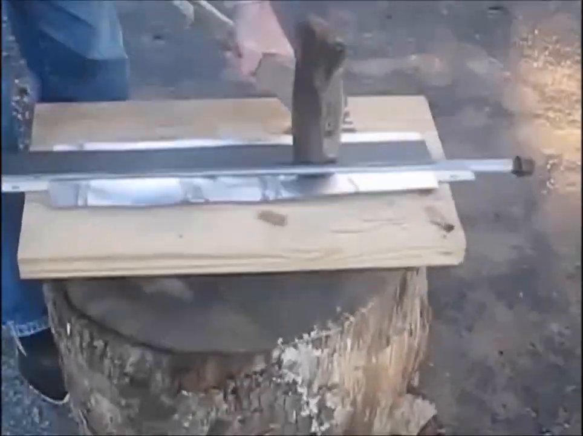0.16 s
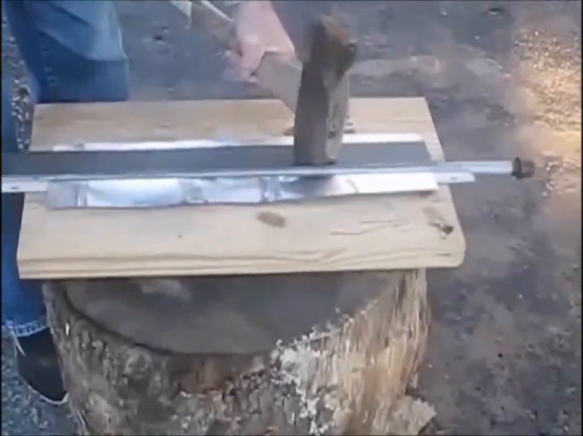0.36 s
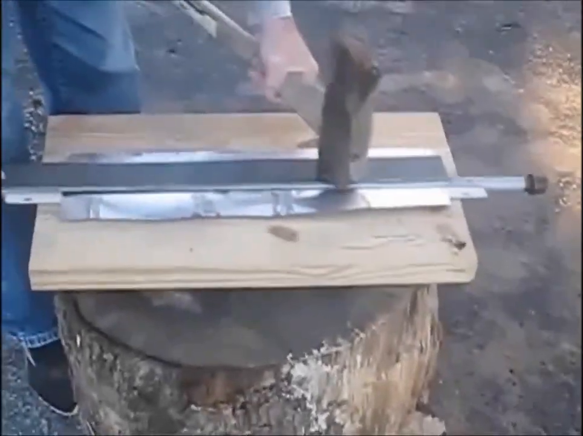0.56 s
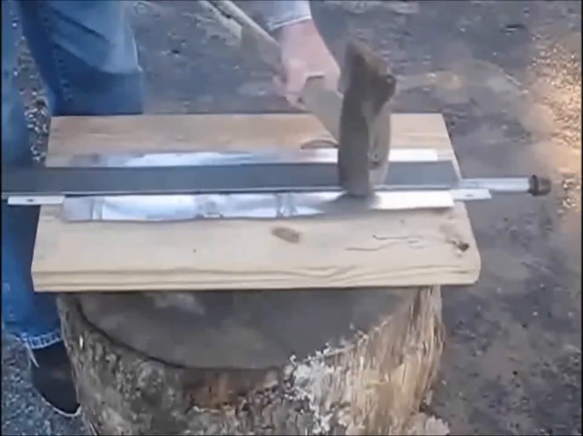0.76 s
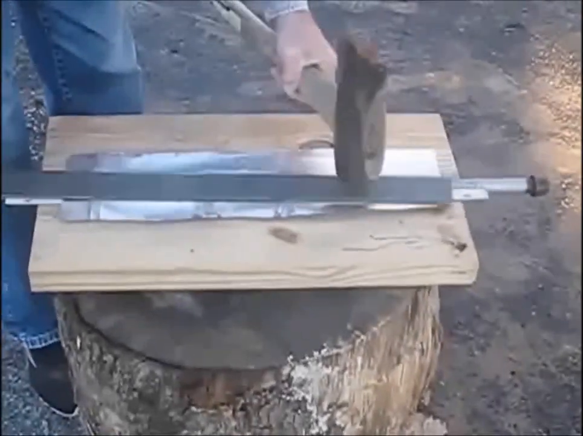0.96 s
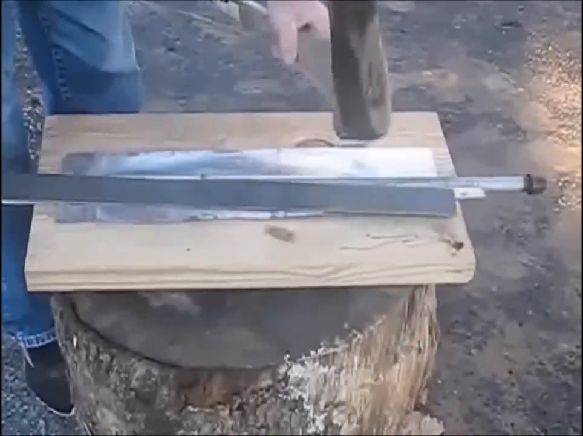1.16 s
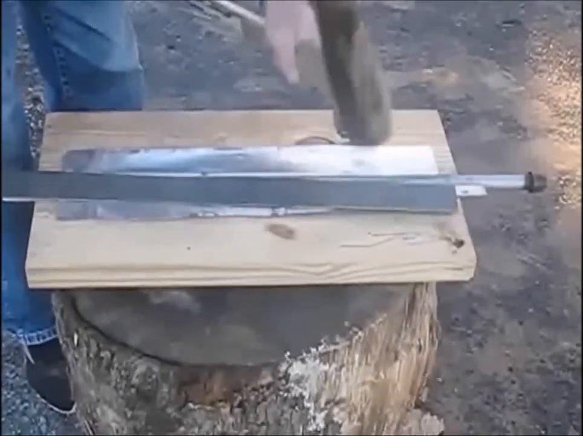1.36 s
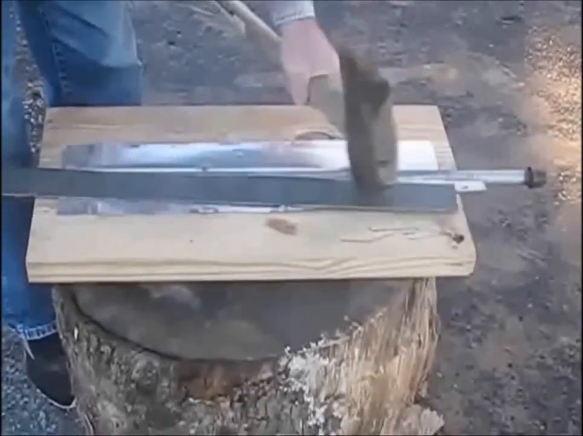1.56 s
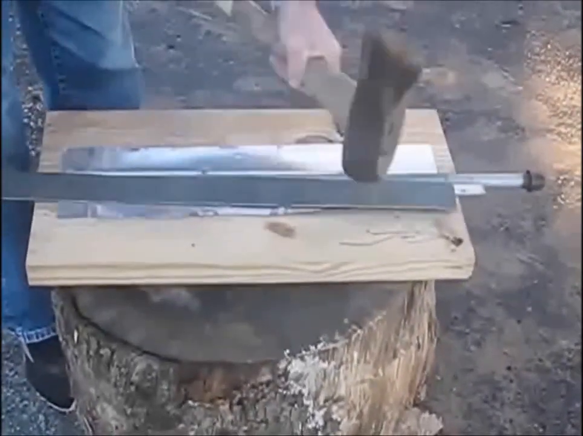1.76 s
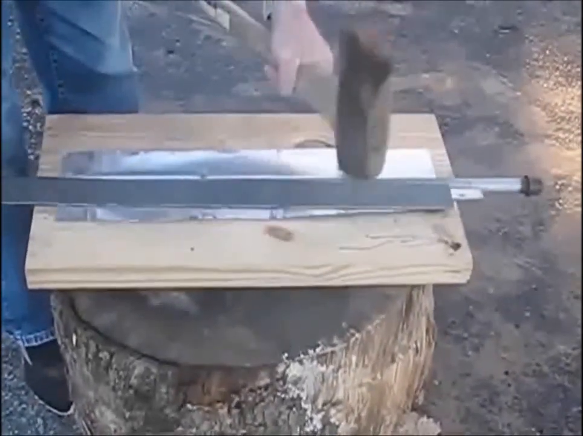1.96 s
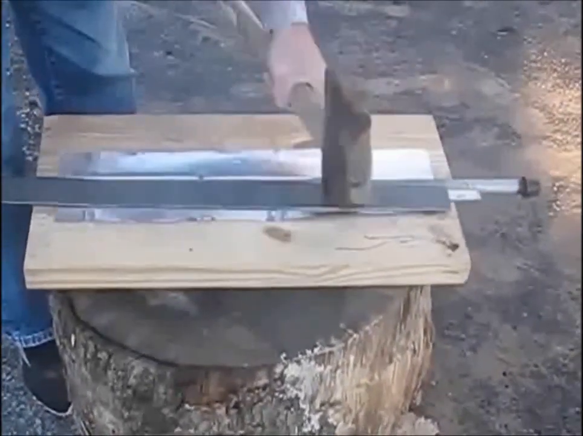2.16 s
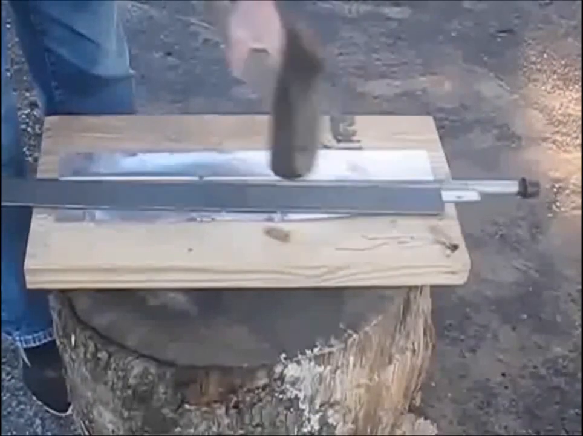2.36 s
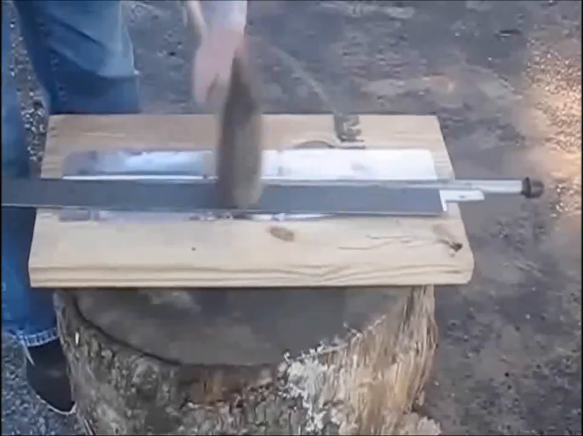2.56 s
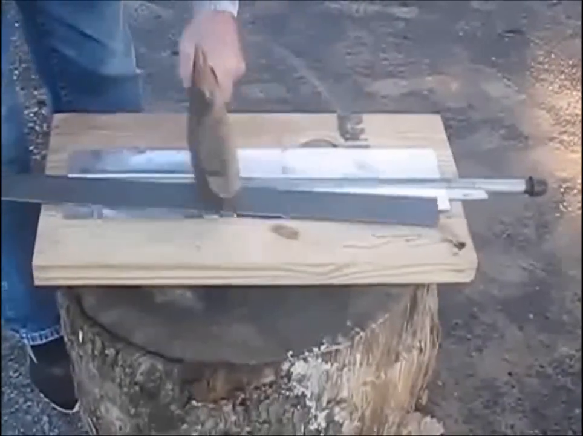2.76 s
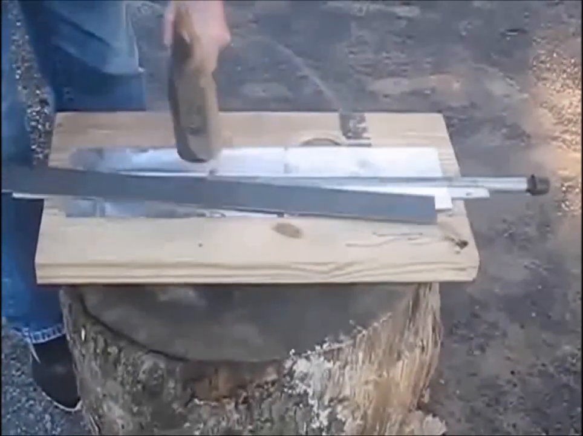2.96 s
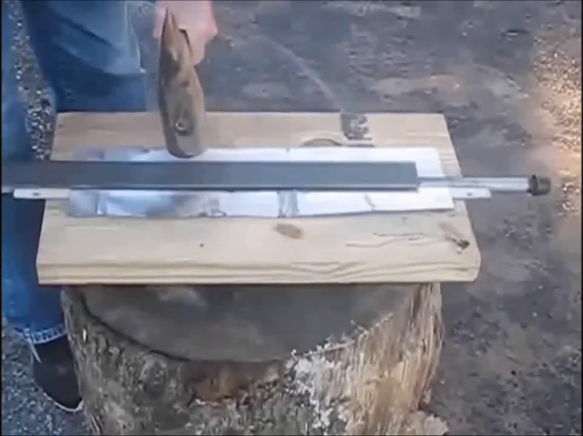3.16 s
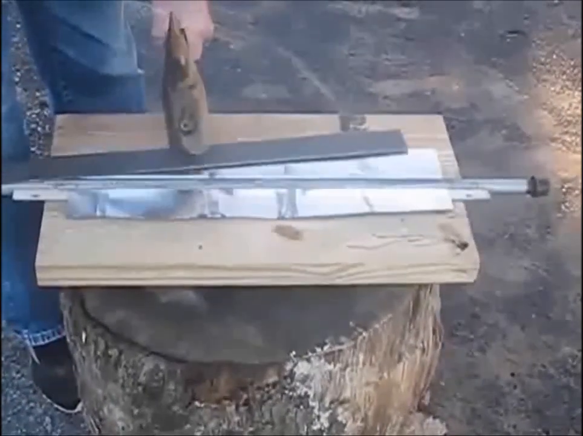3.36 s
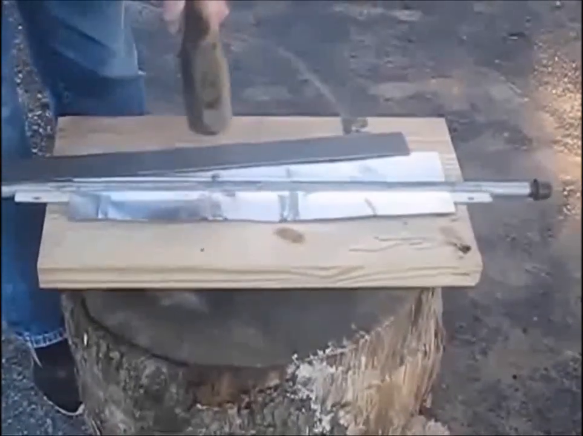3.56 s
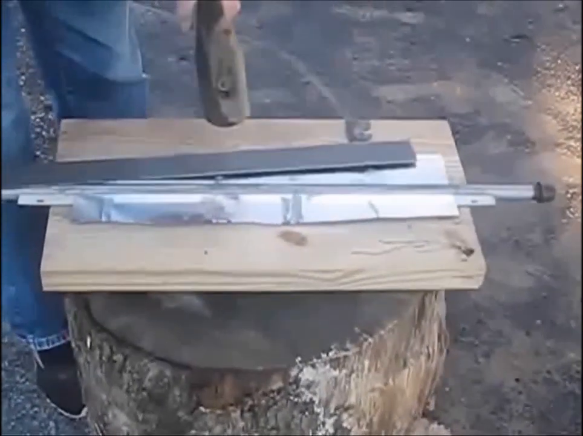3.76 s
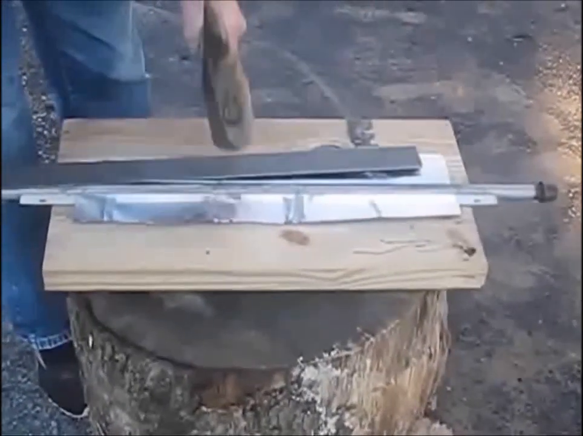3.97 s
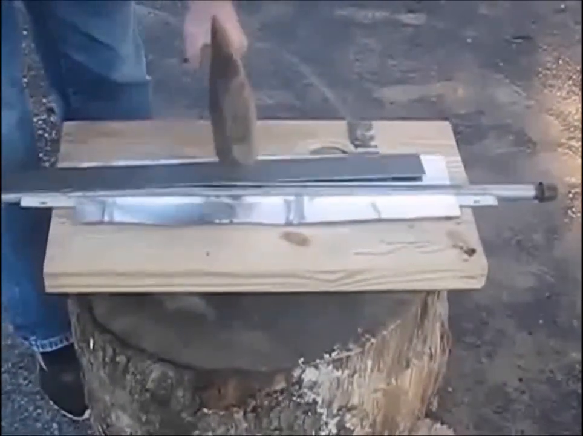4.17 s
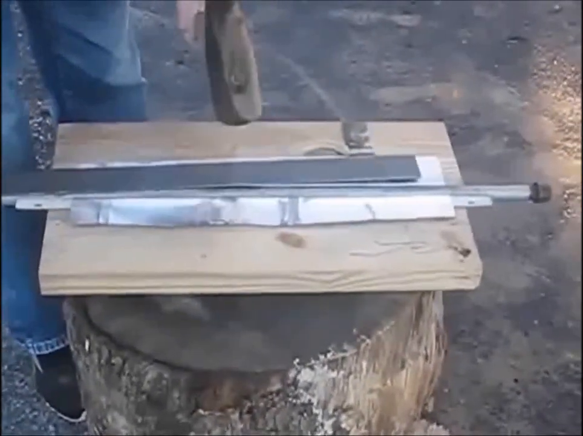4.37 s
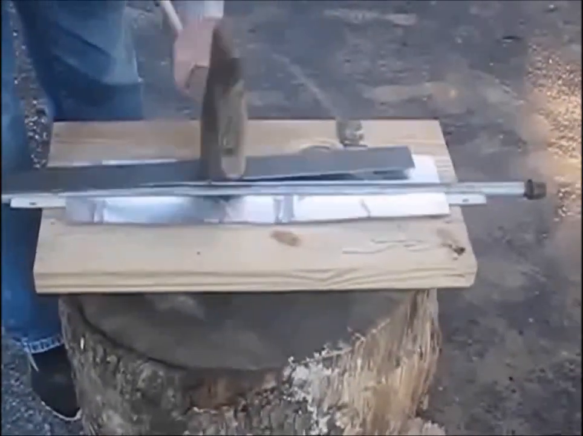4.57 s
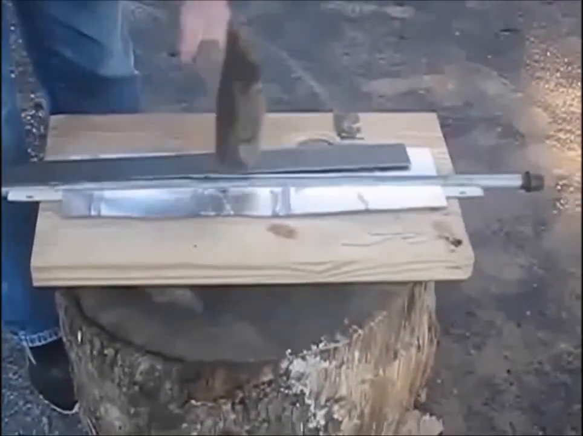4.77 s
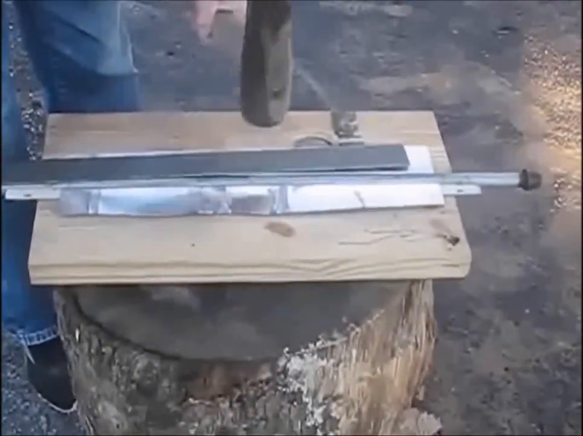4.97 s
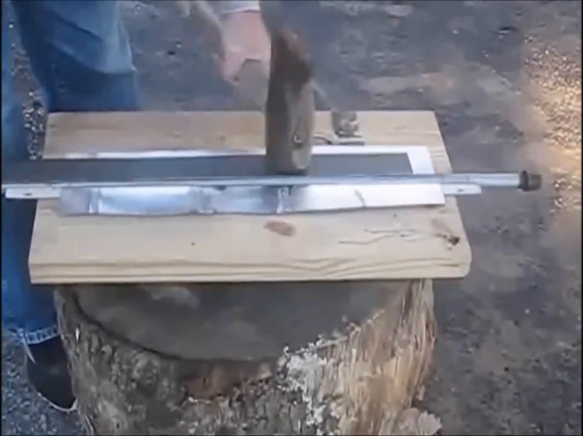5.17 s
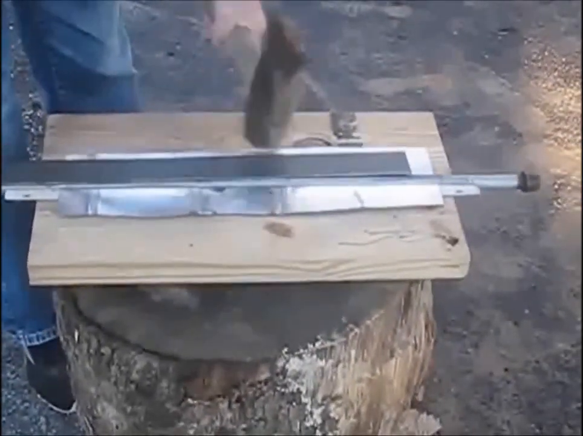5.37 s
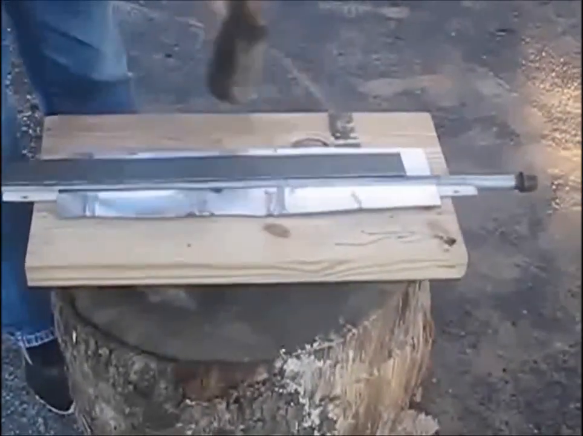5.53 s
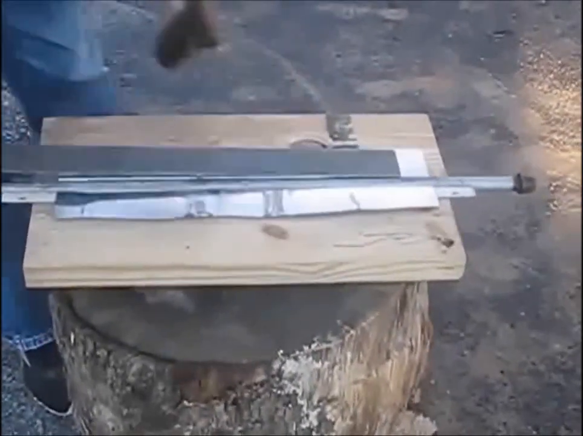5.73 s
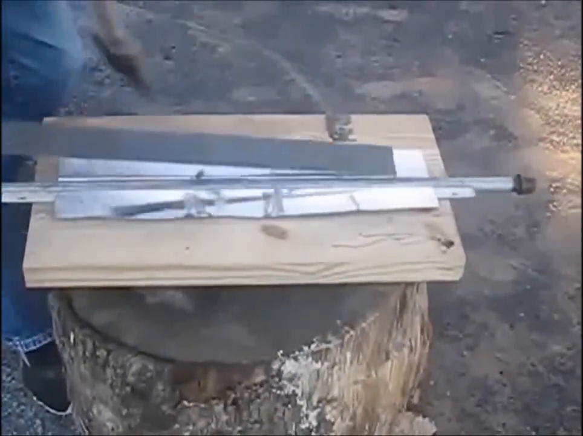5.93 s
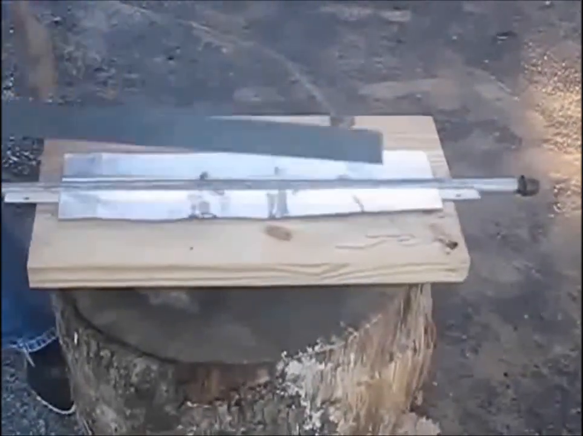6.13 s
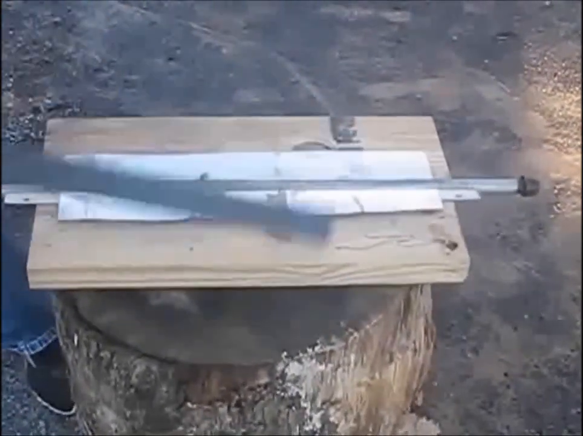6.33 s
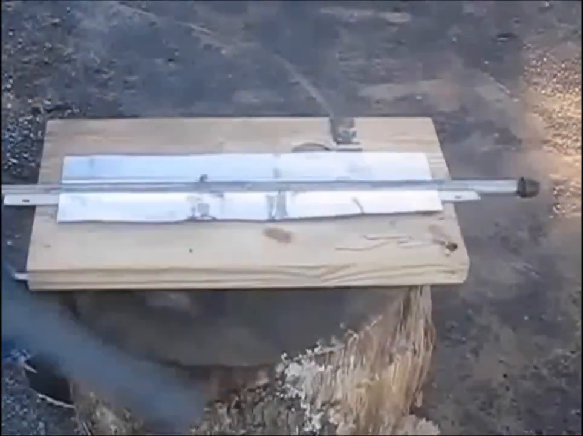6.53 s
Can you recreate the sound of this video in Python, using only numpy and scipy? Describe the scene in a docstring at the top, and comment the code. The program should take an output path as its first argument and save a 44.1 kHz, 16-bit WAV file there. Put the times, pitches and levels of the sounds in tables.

```python
"""A sharp metallic crack, a thud and a short chatter: outdoors, a mallet knocks an iron bar.
The bar lies on thin sheet metal folded round a tube, on a plank over a stump. Each blow is a burst of
collisions, a low plank bounce, and bar and sheet bouncing on each other for about a tenth of a second.
Between blows the bar is slid and shifted: rubbing is filtered grain noise, rasps are stick-slip
impulses, knocks and clanks are damped or sustained partials. At the end the bar is dragged off."""
import sys
import numpy as np
from scipy import signal
from scipy.fft import rfft, irfft
from scipy.io import wavfile
from scipy.ndimage import uniform_filter1d

SR = 44100
rng = np.random.default_rng(int(sys.argv[2]) if len(sys.argv) > 2 else 0)


def dump_mix(stems):
    """Bounce the given channels to the path in sys.argv[1] as a 16-bit WAV at rate SR."""
    frames = np.atleast_2d(stems).T  # one column per channel
    limited = np.clip(frames, -1, 1)  # hard clip at full scale
    pcm = np.round(limited * 32767).astype(np.int16)
    wavfile.write(sys.argv[1], SR, pcm)


N = 291060

TIME = np.arange(N) / SR
AGE = TIME[:SR // 2]  # time since a contact
THUD_LAG_S = 0.00575  # the plank gives way just after the contact


def undb(db):
    """Amplitude ratio: 20 dB is a factor of ten."""
    return 10 ** (np.asarray(db) / 20)


def unit(x):
    """Normalisation to an rms of 1."""
    return x / np.sqrt(np.mean(x ** 2))


def add(track, s, sound):
    """Superposition: a sound is summed into the track at time s."""
    start = int(round(s * SR))
    a, b = max(start, 0), min(start + len(sound), N)
    track[a:b] += sound[a - start:b - start]


def lowpass(x, hz):
    """Second-order low-pass run both ways, so that the phase is kept."""
    return signal.sosfiltfilt(signal.butter(2, hz, fs=SR, output="sos"), x)


def colour(x, points):
    """Minimum-phase filtering: the cepstrum of a (f/Hz, level/dB) curve is made causal; rms is kept."""
    hz, db = np.transpose(points)
    f = np.maximum(np.fft.rfftfreq(len(x), 1 / SR), 1)
    log_gain = np.log(undb(np.interp(np.log(f), np.log(hz), db)))
    cepstrum = irfft(log_gain, len(x))
    response = np.exp(2 * rfft(cepstrum[:len(x) // 2], len(x)))
    return np.std(x) * unit(irfft(rfft(x) * response, len(x)))


def resonate(x, hz, width):
    """A damped mode is a one-pole resonator; white noise of rms 1 comes out at rms 1."""
    r = np.exp(-np.pi * width / SR)
    pole = r * np.exp(2j * np.pi * hz / SR)
    return 2 * np.sqrt(1 - r) * signal.lfilter([1], [1, -pole], x).imag


def contacts(size, rate, spread_db):
    """Rough contact is a random train of tiny collisions of uneven strength and either sign; rms 1."""
    strength = undb(spread_db * np.clip(rng.standard_normal(size), -2, 2))
    struck = rng.random(size) < rate / SR
    return unit(struck * strength * rng.choice([-1, 1], size))


def fade(t60, hold=0):
    """Exponential decay by 60 dB in t60 seconds, after full level for hold seconds."""
    return np.exp(-np.log(1000) * np.maximum(AGE - hold, 0) / t60)


def stroke(age, length, attack_s, t60):
    """Envelope of one push: exponential build-up, a steady stretch, exponential decay after length."""
    build_up = 1 - np.exp(-np.maximum(age, 0) / attack_s)
    return build_up * np.exp(-np.log(1000) * np.maximum(age - length, 0) / t60)


def wander(rate):
    """Slow irregularity: random values joined by straight lines, rate a second."""
    knots = rng.standard_normal(N // 100)
    return np.interp(TIME * rate, np.arange(len(knots)), knots)


def sheet(x, t60=0.026, ring_db=-1.0):
    """High modal density: a thin sheet answers like decaying noise, new whenever it is pressed anew."""
    modes = rng.standard_normal(len(AGE)) * fade(t60)
    ring = signal.fftconvolve(x, modes / np.linalg.norm(modes))[:len(x)]
    return np.std(x) * unit(x + undb(ring_db) * ring)


def air():
    """Broadband ambience: steady noise with a falling spectrum."""
    # quiet outdoor air: f/Hz, level/dB
    air_colour = [(20, 3), (150, -4.5), (400, -2.5), (1500, -4), (3600, -3), (4500, -5.5), (7400, -14)]
    return undb(-67.5) * colour(rng.standard_normal(N), air_colour)


def rumble():
    """Amplitude-modulated low-frequency noise that comes and goes."""
    # level of the low rumble: t/s, level/dB
    rumble_level = [(0, -69), (.7, -62), (1.3, -59.5), (1.65, -66), (2.3, -65), (2.85, -75), (3.25, -64.5),
                    (3.8, -54.5), (4.0, -54), (4.3, -81), (4.47, -76), (4.7, -65), (4.95, -67),
                    (5.55, -63.5), (6.05, -54.5), (6.6, -51.5)]
    lows = [(20, -3.5), (90, -5.5), (200, -9.0), (400, -10.0), (2000, -64.5)]
    level_db = np.interp(TIME, *np.transpose(rumble_level))
    return colour(rng.standard_normal(N), lows) * undb(level_db)


def yard(x, t60=0.38, wet_db=-22):
    """Diffuse scattering: the surroundings return a faint, dull, decaying noise response."""
    build_up = 1 - np.exp(-AGE / 0.044)
    tail = colour(rng.standard_normal(len(AGE)), [(200, 2.0), (2500, -1.0), (7000, -8.5)])
    tail = tail * fade(t60) * build_up
    return x + undb(wet_db) * np.std(x) * unit(signal.fftconvolve(x, tail)[:N])


def slide(grain_db=-5.0, unsteady_db=1.0, flicker_db=2.0, grit_db=-7):
    """Sliding friction of iron on sheet: grains colour with pressure; a resonance glides with each push."""
    # colour of the rubbing: f/Hz, level/dB
    slide_colour = [(130, -30.5), (220, -9), (385, -2), (634, -2.5), (1190, 2.5), (1400, 4.5), (2320, 1),
                    (3760, -3), (4300, -11), (5100, -13.5), (5500, -7), (5900, -18.5), (6250, -20),
                    (6980, -16.5), (7400, -20.5), (9620, -51.5), (16300, -120)]
    # pushes of the bar over the sheet: start t/s, length/s, level/dB, swell over the push/dB,
    # treble/dB, resonance level/dB, resonance from f/Hz, to f/Hz
    push_table = [(0.088, 0.33, -60, -9, -2.5, -24, 2020, 1910),
                  (0.415, 0.11, -51.5, 13, -10.5, -18.5, 1770, 2270),
                  (0.537, 0.21, -41.5, -3, -10, -5.5, 2706, 2190),
                  (0.778, 0.21, -44.5, 5, -8.5, -14, 2000, 2000),
                  (0.981, 0.069, -44.5, 8.5, -3.5, -16, 2930, 1850),
                  (1.113, 0.19, -52.5, -13.5, -2, -4, 1690, 1730),
                  (1.54, 0.29, -49.5, -9, -11, -22, 2080, 1970),
                  (1.791, 0.1, -55.5, -5, -1.5, -15, 1970, 1940),
                  (2.079, 0.28, -54, 2, -2.5, -12, 1690, 1596),
                  (2.366, 0.092, -56.5, -3, 4.5, 1.5, 1600, 1477),
                  (2.443, 0.14, -47, 0, -3.5, 1.5, 1427, 1537),
                  (2.671, 0.17, -41, 3, -11.5, -16, 1914, 2470),
                  (2.885, 0.19, -41.5, 8.5, -7.5, -17, 2490, 2695),
                  (3.113, 0.15, -39, 2, -16.5, -7, 2300, 3050),
                  (3.272, 0.14, -42.5, 0.5, -0.5, -3, 3070, 4010),
                  (3.335, 0.13, -46, 6.5, -24, 6, 1750, 954),
                  (3.507, 0.3, -39.5, 1.5, -10.5, -25, 2520, 2950),
                  (3.839, 0.29, -45.5, -5.5, -9.5, -8.5, 2960, 3200),
                  (4.113, 0.14, -70.5, -2, 2.5, -9, 3040, 2960),
                  (4.738, 0.49, -58.5, -9.5, -7, -15.5, 2000, 1950),
                  (5.177, 0.48, -56, 2.5, -4, -7.5, 2780, 2650),
                  (5.37, 0.08, -73.5, -6, -24, 16.5, 1470, 1425), (5.636, 0.1, -53, 1, -3.5, 2, 2300, 2260),
                  (5.748, 0.48, -50.5, 1.5, -8, -5, 2050, 1882),
                  (6.137, 0.57, -43.5, 6, -2, -5, 2190, 2420)]
    attack_s, t60_s = 0.0085, 0.25
    # a push harder than the pivot grows more in the middle range than in the lows (dB per dB)
    body_db, pivot_db, body_slope = -7.5, -52, 0.43
    base_width_hz, width_doubling_db = 200, 8  # a harder push also smears the resonance wider

    bent = TIME + np.cumsum(.03 * wander(rate=12)) / SR  # the grain drifts in pitch
    grain = sheet(contacts(N, rate=7000, spread_db=3.5), t60=0.045, ring_db=-4)
    fine = np.interp(bent, TIME, grain, period=N / SR)
    grit = contacts(N, rate=260, spread_db=3)  # burrs and dirt catch now and then
    rub = colour(fine + undb(grit_db) * grit, slide_colour)
    body, below_treble = lowpass(rub, 1000), lowpass(rub, 4000)
    lows, middle, treble = unit(body), unit(below_treble - body), unit(rub - below_treble)
    friction = rng.standard_normal(N) + 1j * rng.standard_normal(N)

    out = np.zeros(N)
    for s, length, db, swell_db, treble_db, swish_db, from_hz, to_hz in push_table:
        span = slice(int(s * SR), int(s * SR) + SR)
        age, effort_db = TIME[span] - s, db - pivot_db
        travel = np.minimum(age / length, 1)
        # narrow noise shifted up to the gliding resonance
        hz = from_hz + (to_hz - from_hz) * travel
        width = min(base_width_hz * 2 ** (effort_db / width_doubling_db), 2000)
        drive = signal.sosfilt(signal.butter(2, width / 2, fs=SR, output="sos"), friction[span])
        swish = unit((drive * np.exp(2j * np.pi * np.cumsum(hz) / SR)).real)
        grains = undb(grain_db) * middle[span] + undb(treble_db) * treble[span]
        grains = grains + undb(body_db - body_slope * effort_db) * lows[span]
        level = stroke(age, length, attack_s, t60_s) * undb(db + swell_db * (travel - .5))
        out[span] += level * (grains + undb(swish_db) * swish)
    return out * undb(unsteady_db * wander(rate=16) + flicker_db * wander(rate=80))


def rasp(grit_db=-5):
    """Stick-slip: impulsive slips of the bar on the plank ring low modes that shift with the load."""
    # the bar catching on the plank: start t/s, length/s, level/dB, tilt/dB an octave
    rasp_table = [(0.658, 0.012, -32, 0), (0.793, 0.029, -28, -2), (0.821, .04, -28, 2.5),
                  (0.893, 0.02, -29, 0.5), (0.919, 0.04, -46, 0), (3.404, 0.013, -29, 5),
                  (3.434, 0.022, -32, -1), (3.457, 0.011, -46, 1.5), (6.485, 0.054, -30.5, 6.5)]
    # plank and tube resonances: f/Hz, width/Hz, level/dB
    plank_modes = [(397, 49, 3), (929, 30, 4), (1096, 70, -2.5), (1330, 76, -0.5), (1460, 50, -9),
                   (1730, 72, -1), (2060, 78, -4), (2400, 340, -1.5), (3104, 57, -8)]
    attack_s, t60_s = 0.0086, 0.23
    pushes = np.array([undb(db) * stroke(TIME - s, length, attack_s, t60_s)
                       for s, length, db, _ in rasp_table])
    tilt_db = np.array(rasp_table)[:, 3][pushes.argmax(axis=0)]  # the strongest push sets the colour
    slips = contacts(N, rate=520, spread_db=4.5)
    grit_colour = [(200, -10.5), (400, 8.0), (2400, -9.0), (3300, 0.5), (4500, -23.5), (8000, -37.0)]
    wood = undb(grit_db + tilt_db) * colour(slips, grit_colour)
    for hz, width, db in plank_modes:
        bent = TIME + np.cumsum(.02 * wander(rate=30)) / SR  # the mode drifts in pitch
        gain = undb(db + tilt_db * np.log2(hz / 1000))
        wood = wood + gain * np.interp(bent, TIME, resonate(slips, hz, width))
    wood = colour(wood, [(150, -29.5), (300, 0.5)])
    # the rubbing sets the total power; the resonances only share it
    power = uniform_filter1d(wood ** 2, size=1500)
    return wood / np.sqrt(power + 1e-9) * pushes.max(axis=0)


def knocks(clack_db=-14.5, ring_db=-11, tick_db=0.0, tick_t60=0.0037, softness=0.0045):
    """Impact on a damped body: a tick, one brief resonance of the struck spot, and a dull wooden clack."""
    # dull knocks of bar and tube on the plank: t/s, level/dB, resonance f/Hz, clack t60/s
    knock_table = [(0.667, -19, 1200, 0.19), (0.79, -8.5, 2320, 0.082), (0.792, -13, 1216, 0.093),
                   (0.894, -15.5, 1420, 0.023), (0.944, -13, 2250, 0.077), (0.964, -14.5, 2234, .06),
                   (1.153, -24.5, 1635, 0.13), (1.293, -21.5, 1423, 0.12), (1.305, -23, 1576, 0.12),
                   (1.33, -19.5, 1602, 0.13), (1.455, -10.5, 1880, .05), (1.728, -31, 1152, 0.067),
                   (1.823, -33, 1720, 0.12), (2.0, -10.5, 1004, 0.055), (2.184, -30, 1580, 0.07),
                   (2.398, -31, 2356, 0.14), (2.551, -8.5, 1002, 0.055), (2.752, -22.5, 1590, 0.035),
                   (2.813, -24.5, 2240, 0.029), (2.832, -29.5, 1623, .03), (3.351, -20.5, 1600, 0.028),
                   (3.42, -17.5, 930, 0.065), (3.499, -19.5, 3570, 0.04), (3.68, -12, 1600, 0.036),
                   (4.031, -10, 2830, .045), (4.045, -16.5, 1133, 0.046), (4.251, -39.5, 2320, .1),
                   (4.389, -37.5, 2340, 0.082), (5.244, -30.5, 2250, 0.3), (5.362, -25, 1540, 0.095),
                   (5.576, -27.5, 1980, 0.13), (5.641, -34.5, 2294, 0.036), (5.657, -28.5, 2100, 0.037),
                   (5.68, -30, 1954, .04), (5.934, -35.5, 1950, 0.069), (6.151, -13, 1507, 0.066),
                   (6.172, -8.5, 1740, 0.034), (6.181, -8.5, 1890, 0.049), (6.22, -15, 953, 0.057),
                   (6.228, -20.5, 1540, 0.052), (6.296, -30.5, 1100, 0.044), (6.441, -14.5, 1153, 0.074),
                   (6.473, -13, 2370, 0.081), (6.497, -6, 1736, 0.013), (6.534, -15, 1850, 0.016),
                   (6.539, -4.5, 1840, 0.025)]
    out = np.zeros(N)
    for s, db, hz, t60 in knock_table:
        shape = [(120, -25), (330, -4.5), (hz, 0), (3600, -10), (4500, -22), (7400, -30)]
        rise = 1 - np.exp(-AGE / (softness * t60))  # the longer knocks are also the softer ones
        envelope = rise * (fade(t60) + undb(tick_db) * fade(tick_t60))
        clack = colour(contacts(len(AGE), rate=8400, spread_db=-0.5) * envelope, shape)
        ring = np.sin(2 * np.pi * hz * AGE) * rise * fade(t60 / 2)
        add(out, s, undb(db) * (undb(clack_db) * clack + undb(ring_db) * ring))
    return out


def chatter(length, treble_db, rise_s=0.002, ring_db=-12, ring_width=55, bounce_t60=0.41,
            settle_t60=0.11, detune=0.0032, seating_db=1.5, uneven_db=0.8, treble_t60=0.15):
    """Repeated impact: bar and sheet bounce ever more weakly, ring the bar, then settle, treble first."""
    # bending modes of the bar: f/Hz, level/dB
    bar_modes = [(1500, -21.5), (2346, -7.5), (2805, -6), (3300, -2.5), (3600, -7), (3955, -10), (4250, -7),
                 (4570, -6.5), (4710, -5), (4920, -14.5), (5500, -4), (6100, -10.5), (6320, -14),
                 (6780, -16.5)]
    # colour of the buzzing sheet: f/Hz, level/dB
    buzz_colour = [(59, -34.5), (100, -19), (184, -19.5), (264, -13.5), (884, -7.5), (1180, -9.5),
                   (1490, -2), (1950, -2), (2850, 0.5), (3470, -2), (4720, -3.5), (6640, -8), (7400, -17),
                   (9620, -59), (16300, -120)]
    force = fade(bounce_t60) * fade(settle_t60, length) * (1 - np.exp(-AGE / rise_s))
    unevenness = undb(uneven_db * wander(rate=90)[:len(AGE)])
    clicks = contacts(len(AGE), rate=4500, spread_db=2.5) * force * unevenness
    buzz = colour(sheet(clicks, ring_db=-1), buzz_colour)
    ring = 0
    for hz, db in bar_modes:
        shift, favour = rng.standard_normal(2)  # the bar never lies quite the same way twice
        mode = unit(resonate(clicks, hz * (1 + detune * shift), ring_width))
        ring = ring + mode * undb(db + seating_db * favour)
    metal = buzz + undb(ring_db) * np.std(buzz) * ring
    metal = colour(metal, [(3000, 0), (4500, treble_db)])
    dull = lowpass(metal, 4000)
    return dull + (metal - dull) * fade(treble_t60, length * 0.83)


def thud(hz, t60=0.066, ring_db=-4, ring_t60=0.068):
    """Mass on a spring: the plank, driven down on the stump, bounces at a pitch set by its seating."""
    rise = 1 - np.exp(-AGE / 0.0019)
    shape = [(20, -7), (0.12 * hz, -5), (hz, 0), (2.0 * hz, -7), (800, -15), (3000, -50)]
    push = colour(rng.standard_normal(len(AGE)) * fade(t60, 0.0053) * rise, shape)
    ring = np.sin(2 * np.pi * hz * AGE) * rise * fade(ring_t60, 0.0057)
    return undb(-4.0) * push + undb(ring_db) * ring


def rattles():
    """Light impacts as the bar is set down, shifted and pulled away; only the bumps move the plank."""
    # bar and sheet rattling together: t/s, level/dB, length/s, treble/dB, rise/s
    rattle_table = [(0.772, -30.5, 0.061, 4, 0.0069), (0.923, -31.5, .016, 8, .011),
                    (0.9405, -22.5, 0.035, 2.5, .0012), (1.32, -41, 0.014, 9.5, 0.0054),
                    (1.346, -29, 0.036, -3.5, 0.011), (1.382, -34, .013, 0, .004),
                    (1.927, -39, 0.031, 0, .02), (2.542, -23.5, 0.0065, 7, 0.0016),
                    (2.633, -27.5, 0.057, -2, .002), (2.935, -39, .024, 6, 0.0045),
                    (2.993, -23, 0.056, -1.5, .016), (3.081, -20, 0.039, -2.5, .009),
                    (3.105, -22, 0.0029, 1.5, 0.0017), (3.316, -33, 0.0067, -0.5, .002),
                    (3.483, -39.5, 0.019, 6, 0.0036), (3.607, -30.5, 0.023, 5.5, 0.0082),
                    (3.63, -25.5, .0085, 2, 0.0071), (4.631, -32, 0.0087, 8, 0.0037),
                    (4.657, -39, .035, 0.5, 0.012), (4.693, -37.5, 0.055, -5, .0076),
                    (5.023, -47, .02, 11, .012), (5.128, -29, 0.06, 0, .006),
                    (5.356, -41, 0.011, -4.5, 0.0027), (5.677, -40, 0.013, -5.5, 0.0023),
                    (6.409, -36, 0.018, 10, 0.01)]
    # the bar bumps down on plank and stump: t/s, thud level/dB, thud f/Hz, rattle level/dB
    bump_table = [(0.942, -40, 71, -39), (4.549, -33, 173.2, -47.5), (5.092, -36, 167.5, -33.5),
                  (5.126, -36.5, 159, -37), (6.442, -22, 223, -26.5), (6.524, -25, 326.4, -39)]
    out = np.zeros(N)
    for s, db, length, treble_db, rise_s in rattle_table:
        rattle = chatter(length, treble_db, rise_s=rise_s, ring_db=-25, settle_t60=0.087, uneven_db=1.5)
        add(out, s, undb(db) * rattle)
    out = colour(out, [(130, -5), (330, 1.5)])
    for s, thud_db, thud_hz, rattle_db in bump_table:
        add(out, s, undb(rattle_db) * chatter(0.013, 2, ring_db=-15.5))
        add(out, s + THUD_LAG_S, undb(thud_db) * thud(thud_hz))
    return out


def clanks(rise_s=0.0013, sag_t60=1.0, release_t60=0.025, waver_hz=32, flutter_db=5.5):
    """Sustained partials: bouncing keeps bright iron tones going, wavering as the contact shifts."""
    # the pinched bar buzzes on the tube at two pitches set by where it is held:
    # t/s, length/s, lower f/Hz, lower level/dB, upper f/Hz, upper level/dB
    clank_table = [(1.353, 0.04, 4330, -40, 5390, -48.5), (1.433, 0.013, 4350, -44.5, 5530, -44),
                   (1.467, 0.035, 3700, -34.5, 5440, -27.5), (1.491, 0.063, 4910, -34, 6210, -35),
                   (1.976, 0.0092, 4220, -25, 5600, -37), (2.02, 0.0098, 4550, -28.5, 6420, -38.5),
                   (2.554, 0.037, 4880, -31, 6050, -33.5), (2.634, .044, 4930, -32.5, 6100, -37),
                   (4.523, 0.071, 2883, -29.5, 4580, -29.5), (4.527, .06, 3300, -36.5, 6760, -41),
                   (4.618, 0.014, 5100, -39.5, 5997, -37), (5.064, 0.064, 4247, -33, 5550, -32),
                   (5.078, 0.033, 3370, -32.5, 6720, -38)]
    out = np.zeros(N)
    for s, length, lower_hz, lower_db, upper_hz, upper_db in clank_table:
        envelope = stroke(AGE, length, rise_s, release_t60) * fade(sag_t60)
        for hz, db in (lower_hz, lower_db), (upper_hz, upper_db):
            waver, flutter = wander(rate=250)[:len(AGE)], wander(rate=99)[:len(AGE)]
            tone = np.sin(2 * np.pi * np.cumsum(hz + waver_hz * waver) / SR)
            add(out, s, envelope * undb(db + flutter_db * flutter) * tone)
    return out


def blows(crush_s=0.0074, crush_swell_db=3.0, crack_t60=0.052):
    """Forced impact: after a faint sizzle the mallet crushes bar, sheet and tube together; they chatter."""
    # mallet blows: t/s, lead-in sizzle level/dB, crack level/dB, thud level/dB, thud f/Hz,
    # chatter level/dB, chatter length/s, chatter treble/dB
    blow_table = [(-.012, -37, -20.5, -29.5, 203, -17, 0.083, 6),
                  (1.447, -29, -17, -19.5, 52, -20.5, .12, 1.5),
                  (1.992, -27.5, -15.5, -31, 296.5, -21.5, .098, 0.5),
                  (2.542, -31.5, -19.5, -28.5, 380, -26, 0.084, 2),
                  (4.029, -34, -23.5, -39, 150, -29.5, 0.072, -1),
                  (4.518, -27.5, -15, -31, 189.5, -18.5, .14, 2),
                  (5.053, -31.5, -20.5, -35, 213, -18, 0.13, 4)]
    # colour of the crack: f/Hz, level/dB
    crack_colour = [(100, -6), (250, -4.5), (500, -1.5), (1000, -6), (2200, 1.5), (3500, 1), (4500, -7.5),
                    (7400, -12.5)]
    # a faint bright sizzle swells for 19 ms before each blow
    sizzle_lead_s, sizzle_treble_db = 0.019, 10
    out = np.zeros(N)
    crush = undb(crush_swell_db * np.minimum(AGE / crush_s - 1, 0)) * fade(crack_t60, crush_s)
    for s, sizzle_db, crack_db, thud_db, thud_hz, chatter_db, length, treble_db in blow_table:
        sizzle = chatter(sizzle_lead_s, sizzle_treble_db, rise_s=0.0089, ring_db=-10.0, settle_t60=.035)
        crack = colour(contacts(len(AGE), rate=9000, spread_db=7.5) * crush, crack_colour)
        add(out, s - sizzle_lead_s, undb(sizzle_db) * sizzle)
        add(out, s, undb(crack_db) * crack)
        add(out, s + THUD_LAG_S, undb(thud_db) * thud(thud_hz))
        add(out, s + .002, undb(chatter_db) * chatter(length, treble_db))
    return out


def scene():
    """Superposition of all the metalwork over quiet outdoor air; all but the sliding is scattered."""
    impacts = blows() + clanks() + rattles() + knocks() + rasp()
    return (yard(impacts) + slide() + air() + rumble())[None]


def record(dry):
    """Saturation and band limiting: a small microphone rounds the loudest peaks and rests off zero."""
    ceiling, offset, top_hz = 0.38, -.0016, 7290
    rounded = ceiling * np.tanh(dry / ceiling)
    narrow_band = signal.ellip(12, .3, 70, top_hz, fs=SR, output="sos")
    return offset + signal.sosfilt(narrow_band, rounded)


dry = scene()
out = record(dry)
dump_mix(out)
```